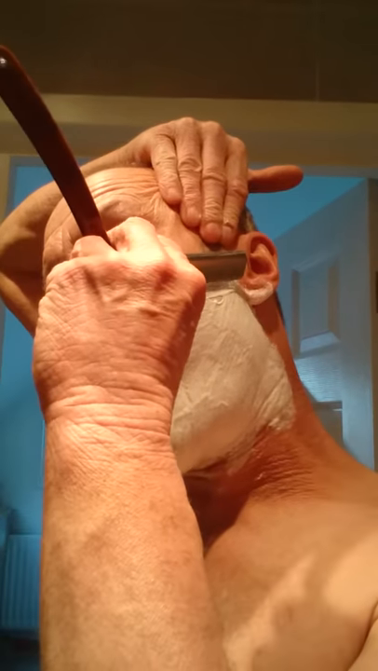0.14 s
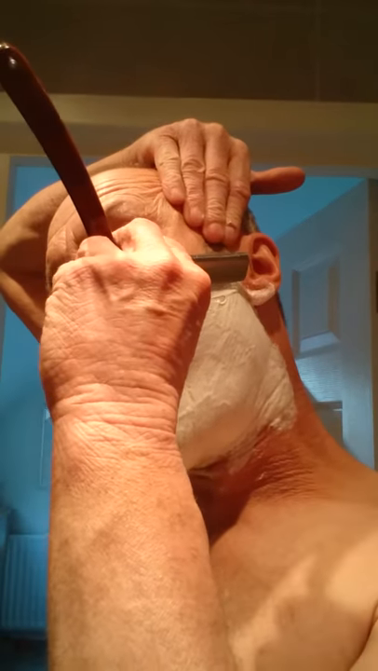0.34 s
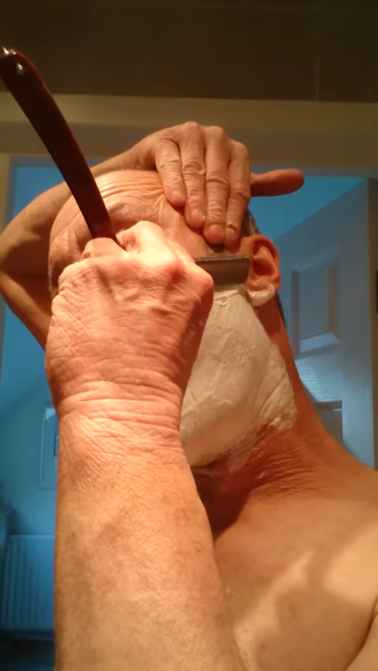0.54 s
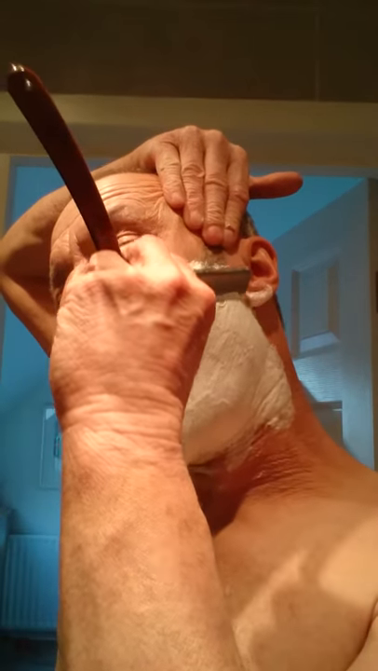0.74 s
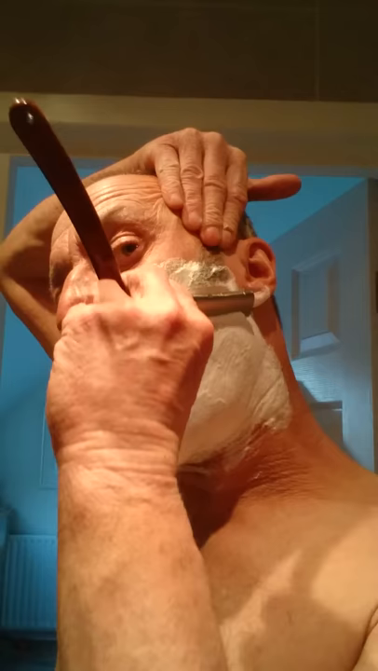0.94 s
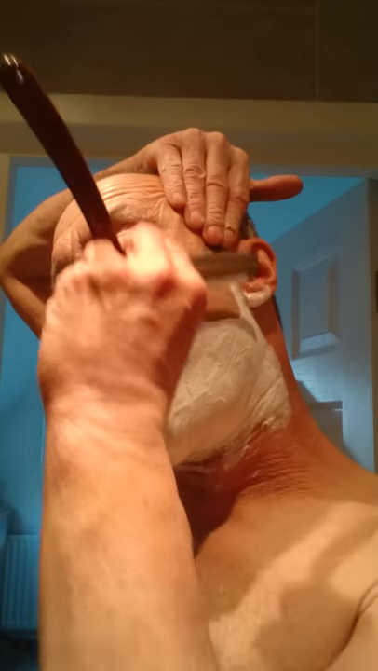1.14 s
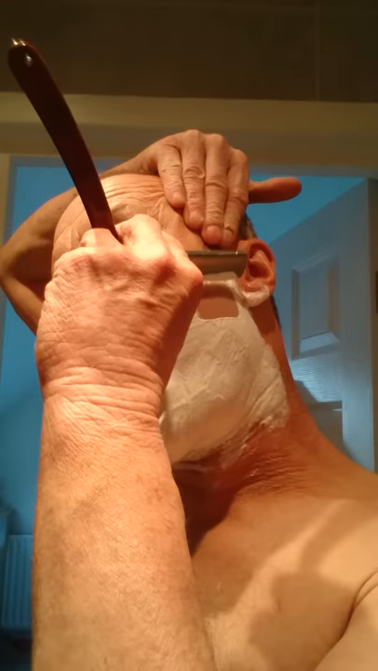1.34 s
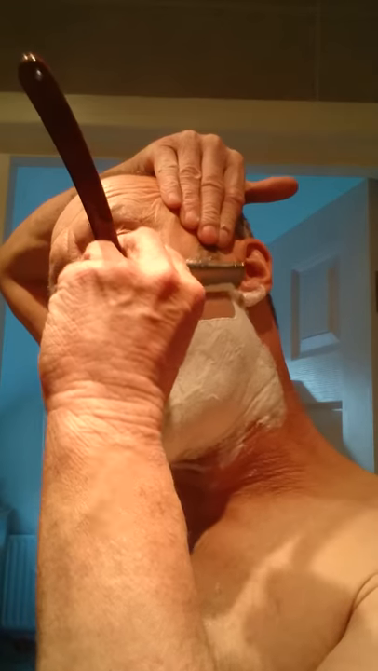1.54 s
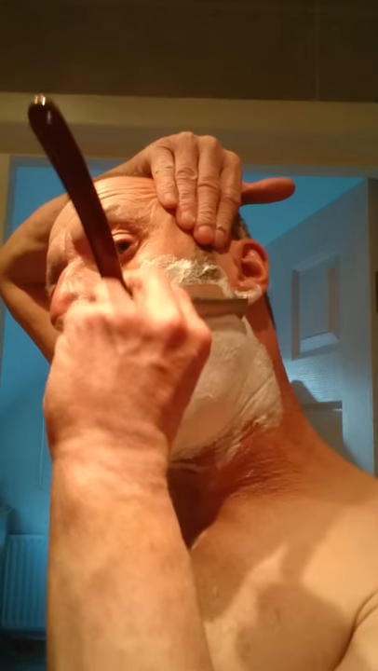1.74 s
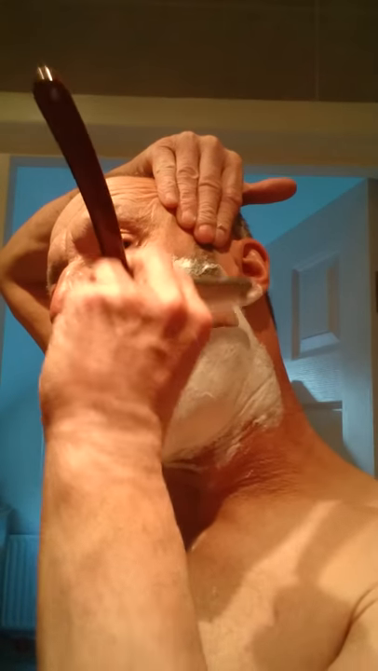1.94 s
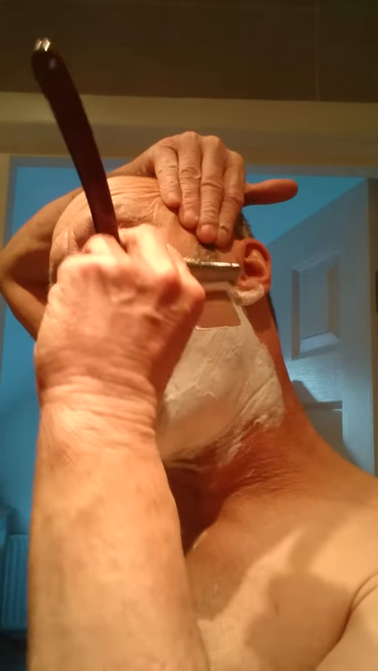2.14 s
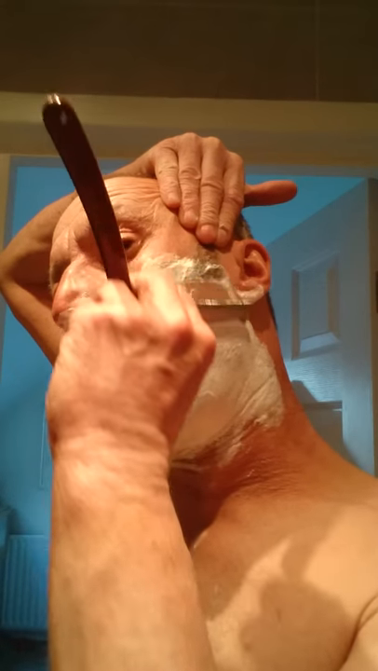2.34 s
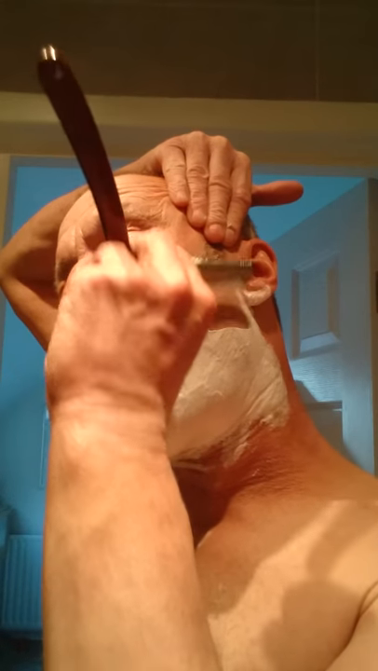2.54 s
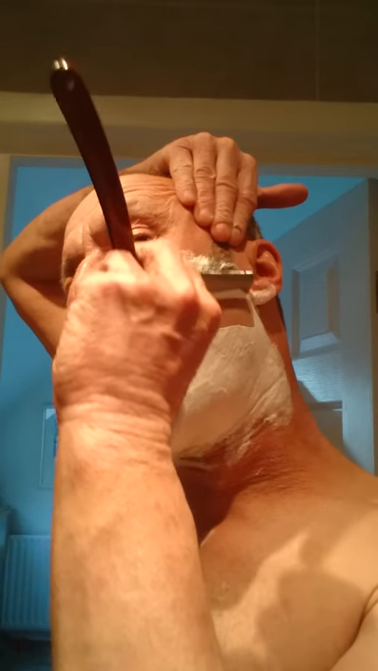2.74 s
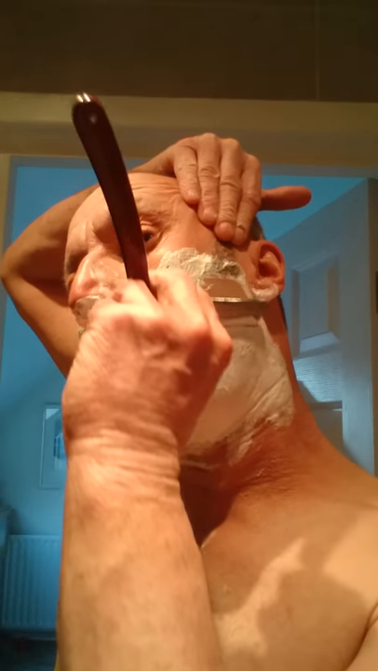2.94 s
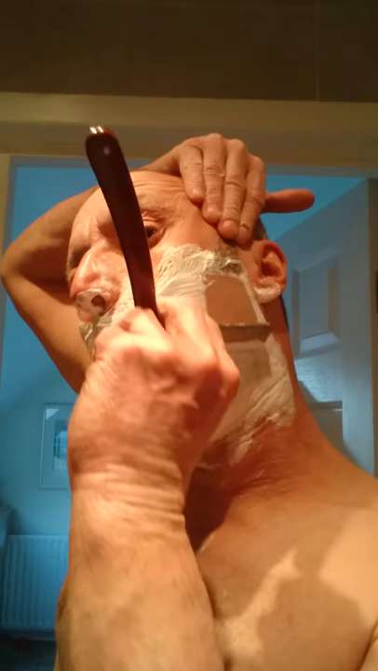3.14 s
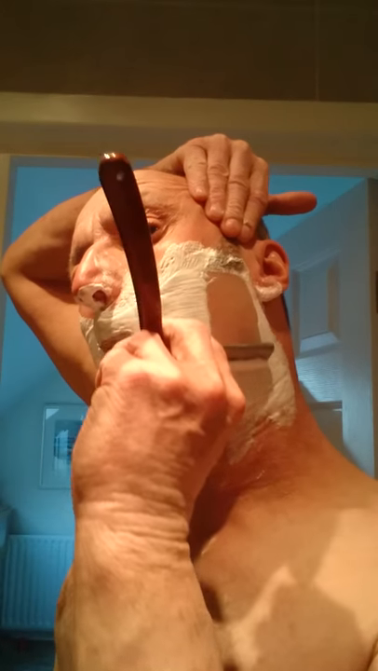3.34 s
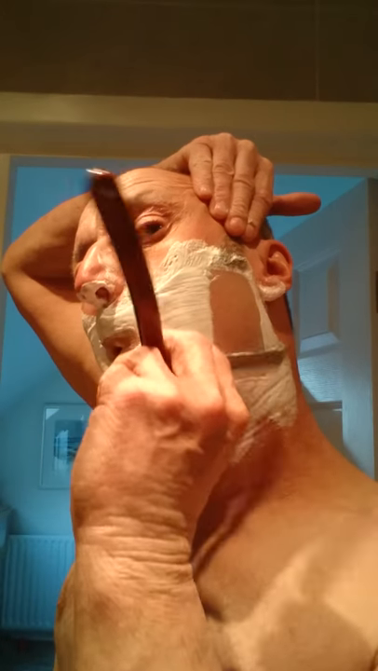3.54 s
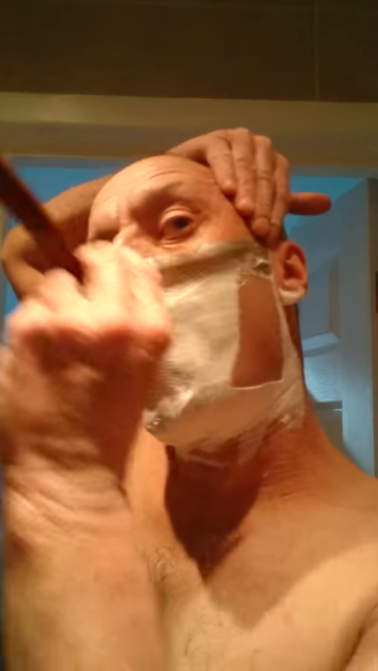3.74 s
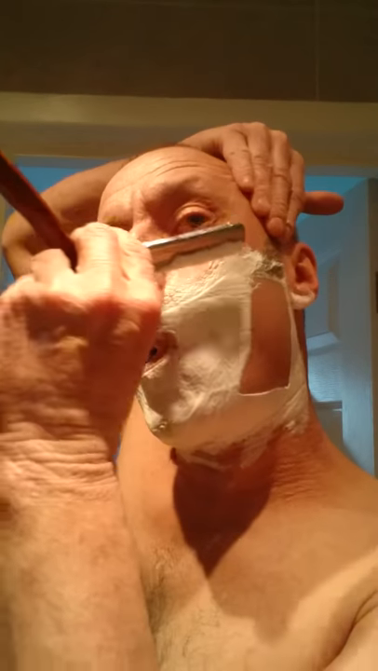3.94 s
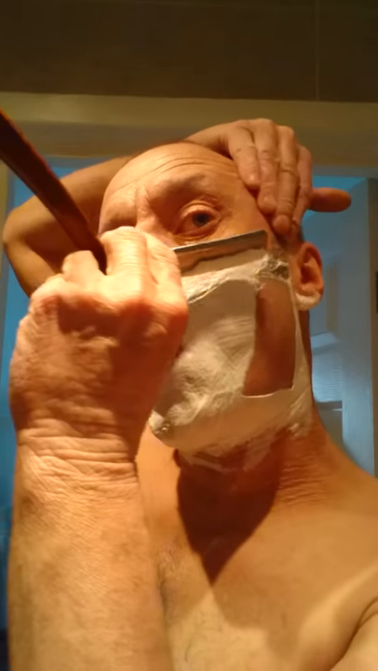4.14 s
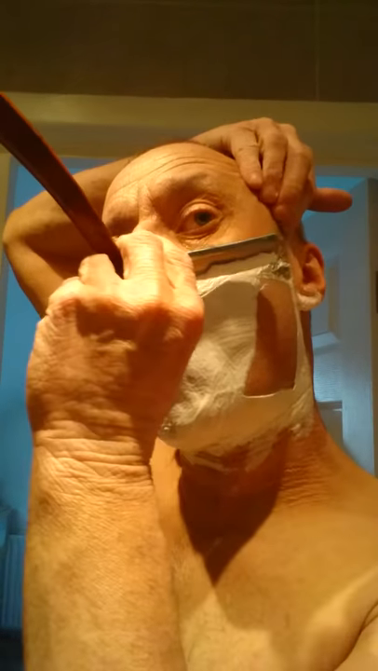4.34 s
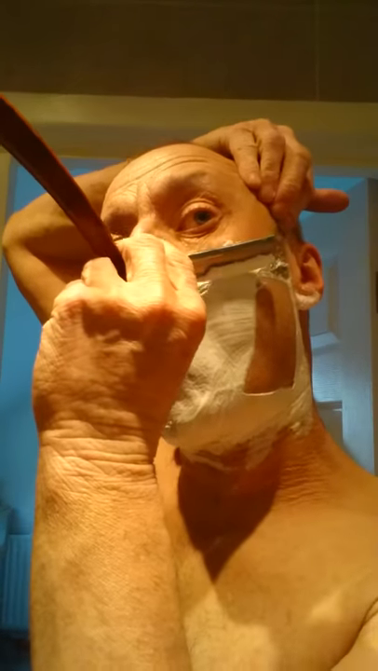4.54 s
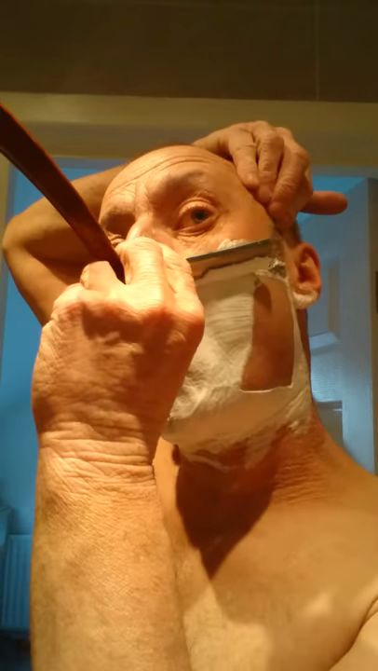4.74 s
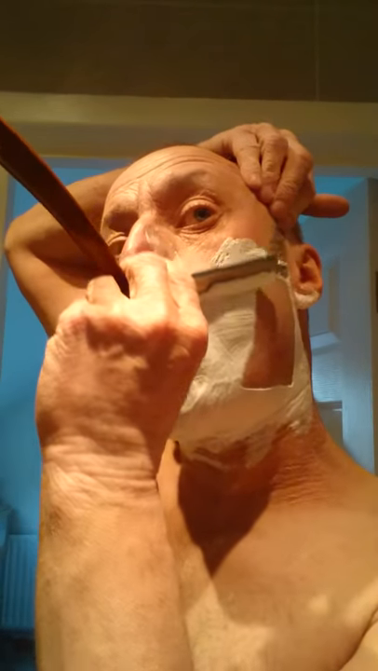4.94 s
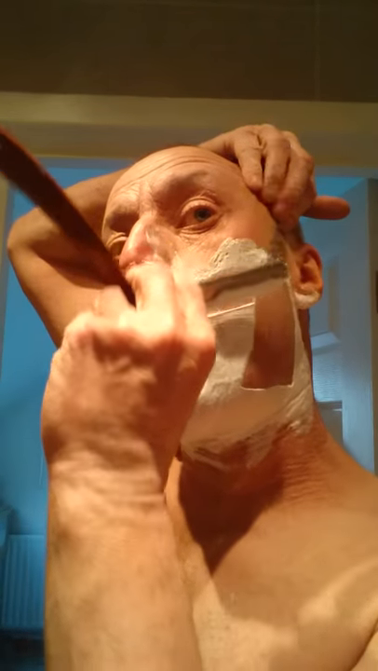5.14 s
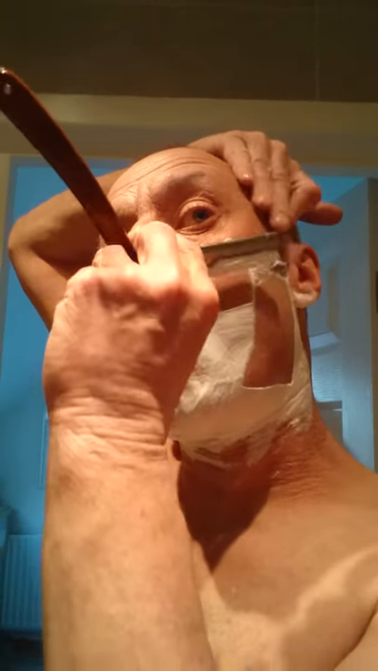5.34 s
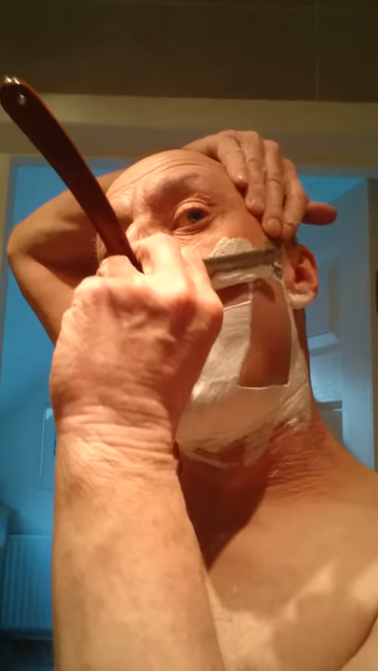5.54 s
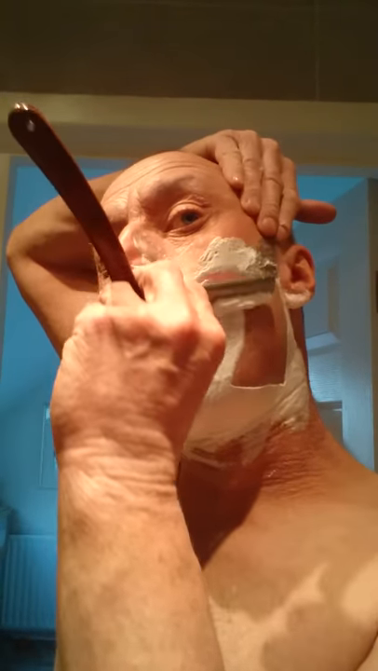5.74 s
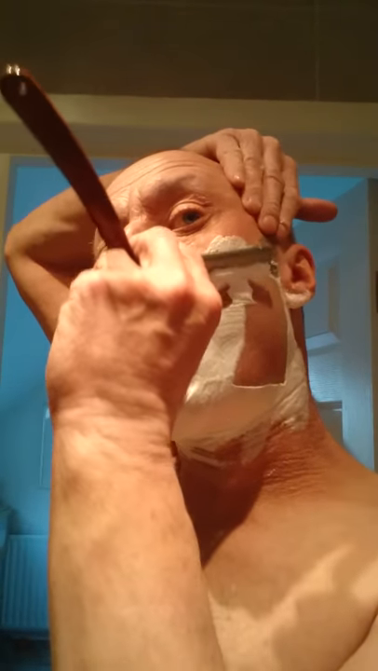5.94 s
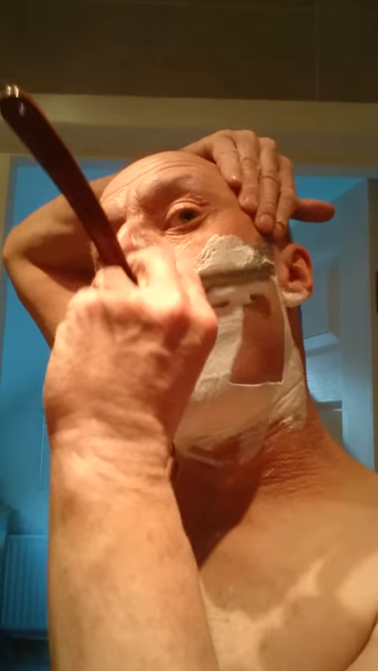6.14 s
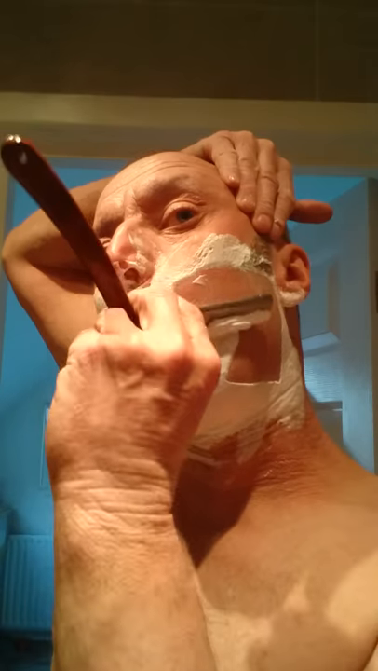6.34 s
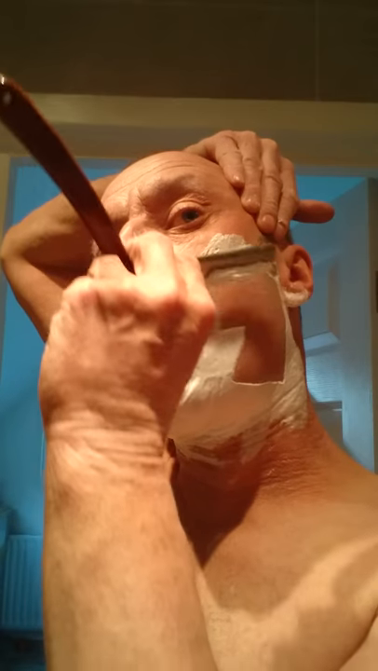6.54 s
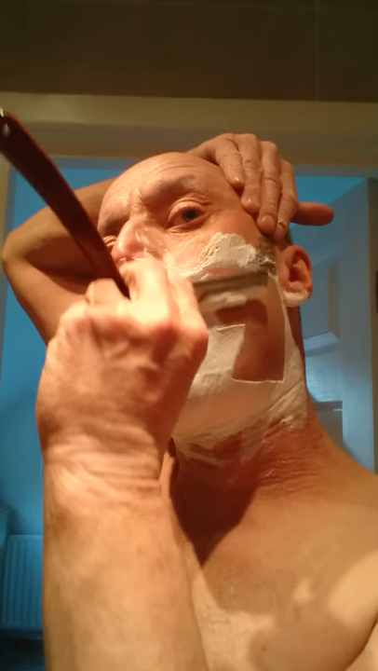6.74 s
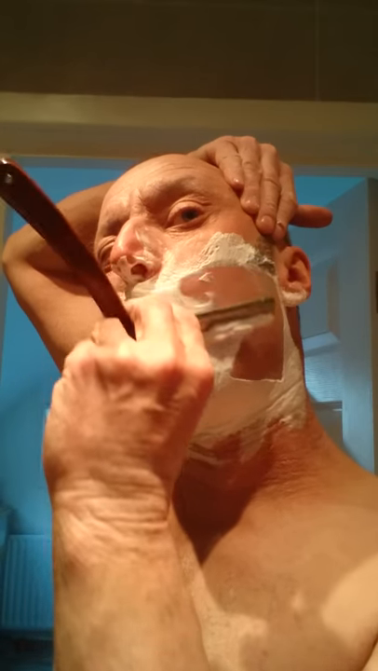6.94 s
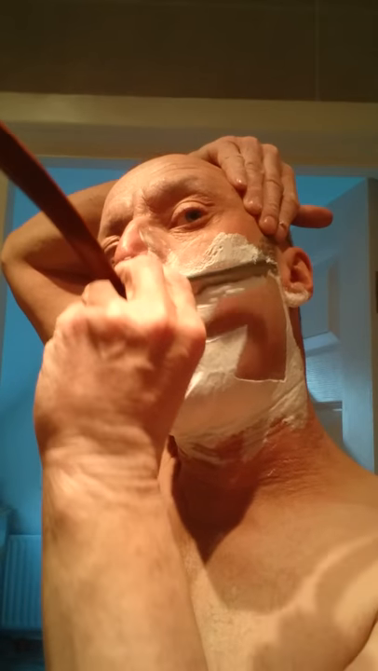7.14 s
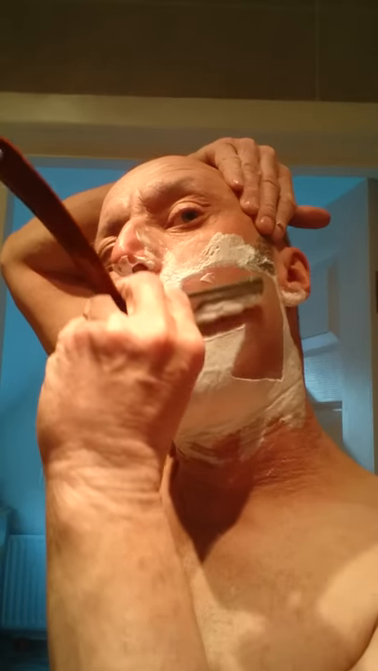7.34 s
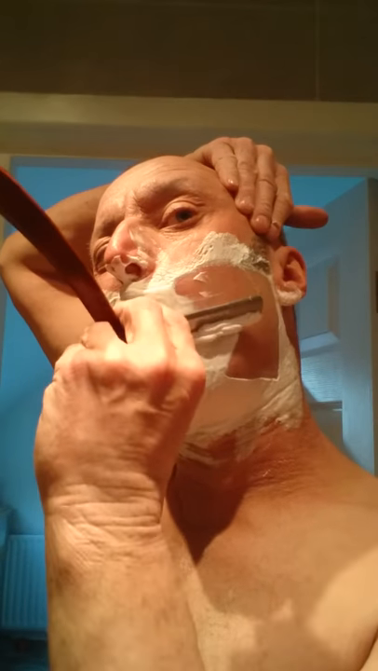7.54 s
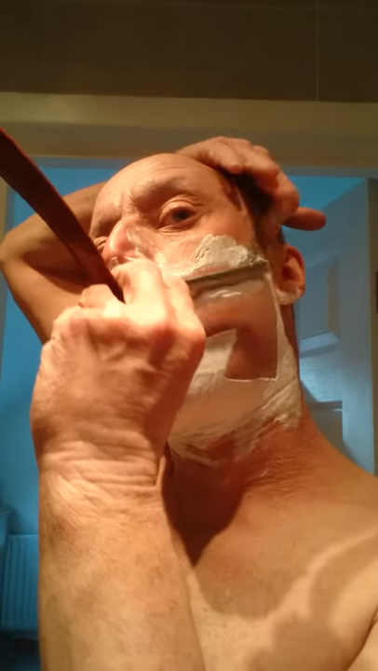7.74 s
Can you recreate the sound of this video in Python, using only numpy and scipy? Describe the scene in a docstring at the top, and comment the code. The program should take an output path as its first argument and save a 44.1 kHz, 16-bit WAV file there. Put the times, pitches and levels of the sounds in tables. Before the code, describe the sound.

Close, bright razor scrapes on a stubbly cheek, with tiny ticks and metallic pings, while a fan hums faintly behind.

```python
"""Short, crackly scrapes of a straight razor shaving a lathered cheek, close by in a small bathroom.
Each cut hair snaps against the thin, hollow-ground blade and makes it ring briefly, high and bright.
Now and then the edge catches on a stiff hair, or pings as it lifts off the skin.
Behind it an extractor fan hums and rushes steadily."""
import sys
import numpy as np
from scipy import signal
from scipy.fft import rfft, irfft
from scipy.io import wavfile
from scipy.ndimage import uniform_filter1d

SR = 44100
rng = np.random.default_rng(int(sys.argv[2]) if len(sys.argv) > 2 else 0)


def unload_wav(signal):
    """Save mono or channel-first audio to the path in sys.argv[1] as 16-bit WAV at rate SR, clipped to [-1, 1]."""
    wavfile.write(
        sys.argv[1],
        SR,
        np.round(np.clip(np.atleast_2d(signal).T, -1, 1) * 32767).astype(np.int16),
    )


N = 344344


# Pulls of the razor. The last four columns are the "grip": how the blade lies on the skin sets its rings.
# start_s, rise_s, hold_s, level_db, swell_db, brighten_db,
# lowest_ring_hz, main_ring_hz, main_width_hz, higher_rings_db
STROKES = [ (0.607, 0.041, .11, -43.5, -3.5, 2, 4000, 4900, 954, -4.5),
           (0.795, .03, 0.21, -40, -6.5, -4, 3850, 4570, 1300, 8),
           (1.48, .05, .025, -60, 5, 0, 3800, 4440, 900, 2),
           (1.535, .09, .245, -37, -5.5, -3, 3800, 4400, 560, 3),
           (2.197, .03, 0.19, -37.5, -2.5, -1, 3900, 4400, 450, 2),
           (2.72, .027, .57, -41, -2, -6, 3860, 4420, 500, -0.5),
           (3.299, 0.029, .248, -50, 6, 4, 3700, 4340, 700, -1.5),
           (4.785, 0.22, .145, -37.7, -3.5, -1, 3480, 4200, 850, -4.2),
           (5.515, .14, 0.17, -43.3, 0, 2, 3420, 4260, 1400, -4.5),
           (5.875, 0.063, .032, -48.5, 4.5, -2, 3390, 4440, 1000, -8),
           (6.125, .02, 0.25, -42.5, 0.5, 4, 3370, 4300, 1400, -1.5),
           (6.716, 0.039, .252, -42.7, 1.8, 2, 3280, 4200, 1400, 0.5),
           (7.325, 0.031, .17, -41, -0.5, 0, 3220, 4550, 1600, 0.5),
           (7.55, 0.027, 0.032, -51, 0, 0, 3220, 4500, 1600, 0)]

def razor_strokes():
    """Each pull scrapes and ticks; every spot along the edge has its own echoes."""
    out = np.zeros((2, N))
    for start_s, rise_s, hold_s, level_db, swell_db, brighten_db, *grip in STROKES:
        force = hand_force(rise_s, hold_s, level_db, swell_db)
        for sound in [*scrape(force, brighten_db, grip), hair_ticks(force, grip)]:
            add(out, to_stereo(sound), start_s)
    return out


def hand_force(rise_s, hold_s, level_db, swell_db, release_db_per_s=255, drag_db=0.8):
    """The edge bites, holds while pressing harder or softer, then eases off. The skin drags unevenly."""
    t = np.arange(int((rise_s + hold_s + 40 / release_db_per_s) * SR)) / SR   # time to fade by 40 dB
    bite = np.minimum(t / rise_s, 1) ** 1.26
    held = np.clip((t - rise_s) / hold_s, 0, 1)
    released_s = np.maximum(t - rise_s - hold_s, 0)
    db = level_db + swell_db * held - release_db_per_s * released_s + drag_db * drift(35, len(t))
    return bite * from_db(db)


def scrape(force, brighten_db, grip, hairs_per_s=2900, dull_db=-3, bright_db=2.5, speed_up_s=0.07):
    """More force is louder and cuts more hairs; a light touch cuts few, so it crackles."""
    t = np.arange(len(force)) / SR
    share_cut = np.maximum((force / force.max()) ** 0.9, 0.2)
    spots = blade(stubble(hairs_per_s * share_cut), grip)
    treble = signal.sosfiltfilt(signal.butter(2, 6600, "high", fs=SR, output="sos"), spots)
    # The scrape starts dull and brightens as the blade gathers speed.
    treble_db = bright_db + (dull_db - bright_db) * np.exp(-t / speed_up_s)
    treble_db += brighten_db * (t - np.average(t, weights=force)) / t[-1]
    spots = rms_one(spots + (from_db(treble_db) - 1) * treble) / np.sqrt(len(spots))
    return spots * force * from_db(0.5)


def stubble(hairs_per_s, spots=5, spread_db=1.0, lather_db=-12):
    """Uneven hairs snap over fizzing lather at a steady overall level, one row per spot on the edge."""
    shape = (spots, len(hairs_per_s))
    chance = hairs_per_s / spots / SR
    cut = rng.random(shape) < chance
    sizes = from_db(spread_db * np.minimum(rng.exponential(1, shape), 4)) * rng.choice([-1, 1], shape)
    snaps = cut * sizes / np.sqrt(chance) + from_db(lather_db) * rng.standard_normal(shape)
    power = uniform_filter1d(np.mean(snaps ** 2, axis=0), size=1100)
    return snaps / np.sqrt(power + 1e-9)


# Longer rings of the steel, which the skin hardly damps: pitch_hz, width_hz, gain_db
LONG_RINGS = [(3846, 18, 2.5), (4300, 37, 0), (5240, 26, -18)]
# The blade's higher rings: pitch_hz, width_hz, gain_db
HIGH_RINGS = [(5510, 1600, -3), (6820, 1100, -7), (9400, 4600, -18), (12400, 4700, -24)]

def blade(snaps, grip, variety=0.67, lowest_width_hz=390, loss_db_per_hz=0.034):
    """Every snap strikes each ring of the blade with a different strength."""
    lowest_hz, main_hz, main_width_hz, higher_db = grip
    lowest_db = -loss_db_per_hz * max(lowest_hz - 3340, 0)   # weaker when pushed higher
    rings = [(lowest_hz, lowest_width_hz, lowest_db), (main_hz, main_width_hz, 0)] + LONG_RINGS
    rings += [(hz, width_hz, db + higher_db) for hz, width_hz, db in HIGH_RINGS]
    steel = 0
    for hz, width_hz, db in rings:
        strikes = snaps * (1 + variety * rng.standard_normal(snaps.shape))
        steel += from_db(db) * resonate(strikes, hz, width_hz)
    # Thin steel gives off almost no sound below its lowest ring.
    low_cut = signal.butter(10, 0.89 * lowest_hz, "high", fs=SR, output="sos")
    skin = from_db(-30) * resonate(snaps, hz=2180, width_hz=300)
    return signal.sosfilt(low_cut, steel) + skin


def hair_ticks(force, grip, ticks_per_s=16, above_force_db=10.5, spread_db=2.2):
    """Stiffer hairs snap one by one at random, as hard as the blade is pressed."""
    cut = rng.random(len(force)) < ticks_per_s / SR
    strength = np.clip(rng.standard_normal(len(force)), -2, 2)
    snaps = cut * force * from_db(above_force_db + spread_db * strength)
    rings = soften(blade(snaps, grip), above_hz=8000, order=2)
    return rings * snaps.max() / (np.abs(rings).max() + 1e-12)


# The edge catches hard on single stiff hairs: start_s, level_db
CATCHES = [(0.638, -34), (0.6935, -29.5), (1.054, -30), (1.0812, -30.5), (1.6267, -27), (1.691, -25),
           (1.6983, -24), (1.7172, -26), (2.2201, -28), (2.3221, -27), (2.7422, -30), (2.8624, -29),
           (4.7912, -38.5), (4.8306, -34.5), (4.861, -33.5), (4.888, -33), (4.922, -30), (5.5505, -37),
           (6.138, -31), (6.4348, -37), (7.605, -34), (7.6428, -32.5)]

def hair_catches(tear_s=0.0009, gain_db=-10.5):
    """A stiff hair tears in a tiny, duller burst that rings the blade with the latest stroke's grip."""
    out = np.zeros((2, N))
    t = np.arange(2600) / SR
    stroke_starts = [row[0] for row in STROKES]
    for start_s, level_db in CATCHES:
        latest = max(np.searchsorted(stroke_starts, start_s) - 1, 0)
        tear = rng.choice([-1, 1], len(t)) * np.exp(-t / tear_s)
        tick = soften(blade(tear, grip=STROKES[latest][6:]), above_hz=7000, order=3)
        tick /= np.std(tick[:220])   # the first 5 ms set the level
        add(out, from_db(level_db + gain_db) * to_stereo(tick), start_s)
    return out


# The blade leaves the skin: start_s, level_db, pitch_hz, fade_s (time to fall by 60 dB)
LIFT_OFFS = [(1.081, -43.5, 4320, 0.057), (1.9, -40, 4340, 0.06), (2.527, -46.5, 4500, .035),
             (3.572, -39, 4200, 0.059), (6.436, -47, 4250, 0.043)]

def lift_offs(width_hz=350, gain_db=1.0):
    """The edge flicks off the skin and its main ring dies away freely."""
    out = np.zeros((2, N))
    t = np.arange(int(0.3 * SR)) / SR
    for start_s, level_db, pitch_hz, fade_s in LIFT_OFFS:
        ring = resonate(rng.standard_normal(len(t)), pitch_hz, width_hz)
        ring = resonate(ring, pitch_hz, 2 * width_hz) * from_db(-60 * t / fade_s)
        ring /= np.abs(ring).max()
        add(out, from_db(level_db + gain_db) * to_stereo(ring), start_s)
    return out


# The razor's tone on the left and on the right: pitch_hz, gain_db
LEFT_TONE = [(2000, 11), (3400, -9), (4400, -0.5), (5600, 2), (6700, -3.5), (9500, -3), (10500, -6),
             (11700, -19), (15500, -16.5)]
RIGHT_TONE = [(2000, 0.5), (3400, 7), (4400, 6.5), (5600, 3), (6700, -1.5), (9500, -5), (10500, -8),
              (12200, -2.5), (15500, -5)]

def to_stereo(x):
    """Each side has its own tone and echoes; sound reaches the right up to four samples later."""
    lag = rng.integers(0, 5)
    left, right = np.pad(x, (0, lag)), np.pad(x, (lag, 0))
    return np.array([bathroom(colour(left, LEFT_TONE)), bathroom(colour(right, RIGHT_TONE))])


def bathroom(x, face_db=-6, wall_db=-10, tail_db=-11, fade_s=0.24, echoes=8):
    """Sound arrives directly, then off face and hand, then off near walls, then as a wash off tiles."""
    t = np.arange(int(0.3 * SR)) / SR
    tail = soften(rng.standard_normal(len(t)), above_hz=7000, order=1)
    tail *= from_db(-60 * t / fade_s) * (t > 0.005)
    room = from_db(tail_db) * tail / np.linalg.norm(tail)
    room[0] = 1   # the direct sound
    for first_s, last_s, db in [(0.0003, 0.002, face_db), (0.002, 0.012, wall_db)]:
        lags = (rng.uniform(first_s, last_s, echoes) * SR).astype(int)
        room[lags] += from_db(db) * rng.choice([-1, 1], echoes) / np.sqrt(echoes)
    return signal.fftconvolve(x, room / np.linalg.norm(room))


# The shapes of the air's low rush and high hiss: pitch_hz, gain_db
AIR_RUSH = [(26, -40), (42, -8.5), (65, -18), (120, -13), (200, -10.5), (290, -8.5), (350, -5), (450, -8.5),
            (560, -4.5), (780, -4.5), (1020, -2), (1250, -6), (1600, -15), (2100, -57)]
AIR_HISS = [(820, -44), (1400, -5.5), (1660, -4.5), (2210, -3.5), (2400, -4.5), (2860, -6), (3650, -8.5),
            (4000, -5), (4610, -11.5), (5110, -11.5), (6140, -14), (10900, -27), (15200, -25), (16000, -27)]
# Rings of the fan's housing and duct: pitch_hz, width_hz, level_db
DUCT_RINGS = [(82.4, 17, -81.5), (316, 17, -77), (396, 12, -77.5), (793, 21, -73.5), (870, 19, -70),
              (1120, 74, -65.5), (1125, 100, -68.5), (1938, 38, -73.5), (2207, 25, -74.5),
              (3018, 45, -74.5), (3420, 38, -79), (4080, 150, -71.5)]

def fan_air(rush_db=-62, hiss_db=-61.5):
    """Air rushes and hisses through the fan and makes the housing and duct ring."""
    hz = np.fft.rfftfreq(N, 1 / SR)
    shapes = [(from_db(at_hz(AIR_RUSH, hz)), rush_db), (from_db(at_hz(AIR_HISS, hz)), hiss_db)]
    shapes += [(1 / (1 + ((hz - pitch) / width) ** 2), db) for pitch, width, db in DUCT_RINGS]
    power = sum((from_db(db) * rms_one(shape)) ** 2 for shape, db in shapes)
    return np.sqrt(power.mean()) * stereo_air(hz, np.sqrt(power))


# How alike the air sounds on both sides: pitch_hz, likeness (below 0, the sides move opposite ways)
AIR_LIKENESS = [(45, -0.3), (70, 2), (95, 0.9), (130, -0.8), (300, -0.8), (650, -0.3), (1150, 0.64),
                (2300, 0), (8000, 0)]
# Which side the air is louder on: pitch_hz, left_minus_right_db
AIR_BALANCE = [(60, 3), (110, -7.5), (200, 1), (380, -2), (700, -4.5), (1290, -0.5), (2380, -6.5),
               (4400, -5.5), (8120, 2.5), (15000, -2.5)]

def stereo_air(hz, gain):
    """Noise shaped by a gain at each pitch, partly shared between left and right."""
    alike = np.clip(at_hz(AIR_LIKENESS, hz), -0.95, 0.95)
    shared, opposed = rfft(rng.standard_normal((2, N)))
    side = np.array([[1], [-1]])
    spectrum = shared + side * np.sqrt((1 - alike) / (1 + alike)) * opposed
    balance = from_db(side * at_hz(AIR_BALANCE, hz) / 2)
    noise = irfft(spectrum * gain * balance, N)
    return noise / np.std(noise.mean(axis=0))


# Tones of the motor and of the spinning rotor: multiple, level_db, left_minus_right_db, left_lead_rad
MOTOR_TONES = [(2, -68.3, -1.5, 3.72), (6, -68.5, 2.5, -0.14), (8, -60, -8, -2)]
ROTOR_TONES = [(2, -78.5, 5, 0), (3, -80.5, -22, -0.5), (4, -63.5, -0.3, -2.5), (6, -74, -2, -1),
               (8, -65, 3.5, 0.75), (9, -75, -10, -0.5), (10, -77.5, -22.5, 1)]

def fan_hum(mains_hz=50.07, rotor_hz=126.98):
    """The motor hums at multiples of the mains frequency, and the rotor adds tones of its own."""
    motor = machine_tones(mains_hz, MOTOR_TONES, wander=0.00021, waver_db=1.7)
    rotor = machine_tones(rotor_hz, ROTOR_TONES, wander=0.00098, waver_db=1.5)
    return motor + rotor


def machine_tones(base_hz, tones, wander, waver_db):
    """Wavering tones of a turning machine; standing waves change their level and timing on each side."""
    angle = 2 * np.pi * np.cumsum(base_hz * (1 + wander * drift(3, N))) / SR
    side = np.array([[0.5], [-0.5]])
    out = np.zeros((2, N))
    for multiple, level_db, balance_db, lead_rad in tones:
        level = from_db(level_db + side * balance_db + waver_db * drift(4.3, N))
        phase = multiple * angle + side * lead_rad + rng.uniform(0, 2 * np.pi)
        out += np.sqrt(2) * level * np.sin(phase)
    return out


def from_db(db):
    """Turn decibels into a number to multiply by."""
    return 10 ** (np.asarray(db) / 20)


def rms_one(x):
    """Scale to an average power of 1."""
    return x / np.sqrt(np.mean(x ** 2) + 1e-20)


def at_hz(points, hz):
    """Read between a table's rows, with every octave equally wide."""
    pitches, values = np.transpose(points)
    return np.interp(np.log(np.maximum(hz, 1)), np.log(pitches), values)


def drift(turns_per_s, size):
    """A slow random wobble that typically strays by about 1."""
    points = rng.standard_normal(int(size * turns_per_s / SR) + 2)
    return np.interp(np.arange(size) * turns_per_s / SR, np.arange(len(points)), points) * np.sqrt(3 / 2)


def resonate(x, hz, width_hz):
    """Ring at one pitch; a narrower width rings longer."""
    decay = np.exp(-np.pi * width_hz / SR)
    feed = np.array([1, 0, -1]) * (1 - decay ** 2) / 2
    feedback = [1, -2 * decay * np.cos(2 * np.pi * hz / SR), decay ** 2]
    return signal.lfilter(feed, feedback, x + 1e-18)


def soften(x, above_hz, order):
    """Turn down the treble; a higher order cuts more steeply."""
    return signal.sosfilt(signal.butter(order, above_hz, fs=SR, output="sos"), x)


def colour(x, points, size=1024):
    """Shape the tone without smearing any sound earlier in time (a minimum-phase filter)."""
    gain = from_db(at_hz(points, np.fft.rfftfreq(size, 1 / SR)))
    cepstrum = irfft(np.log(gain))
    cepstrum[1:size // 2] *= 2
    cepstrum[size // 2 + 1:] = 0
    response = irfft(np.exp(rfft(cepstrum)))
    return signal.fftconvolve(x, response)[:len(x)]


def add(out, sound, start_s):
    """Mix in a stereo sound at its start time."""
    start = int(start_s * SR)
    out[:, start:start + sound.shape[1]] += sound[:, :N - start]


def scene():
    """The razor in front, the fan behind."""
    return razor_strokes() + hair_catches() + lift_offs() + fan_air() + fan_hum()


def record(dry):
    """Cut the very highest treble steeply, above 15900 Hz."""
    return signal.sosfilt(signal.ellip(12, 0.1, 70, 15900, fs=SR, output="sos"), dry)


dry = scene()
out = record(dry)
unload_wav(out)
```